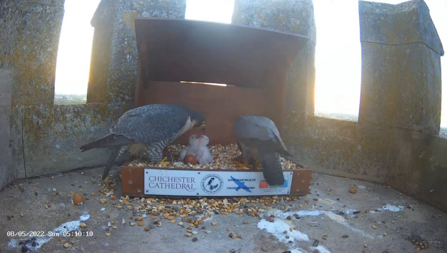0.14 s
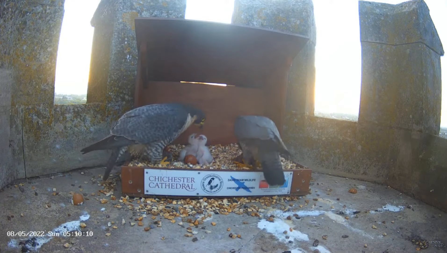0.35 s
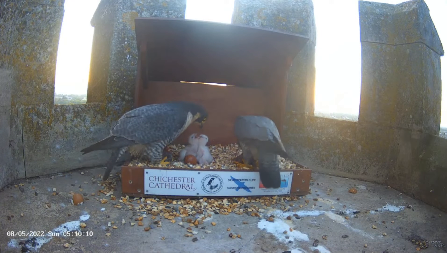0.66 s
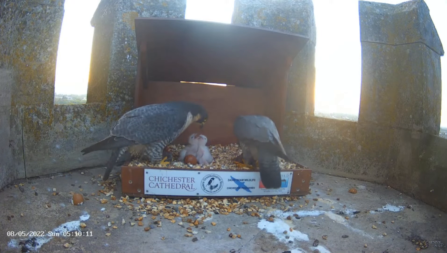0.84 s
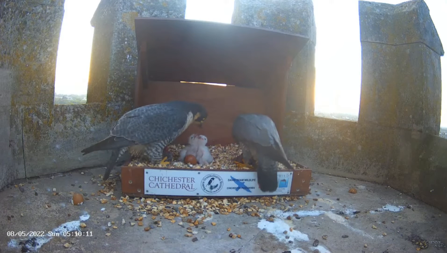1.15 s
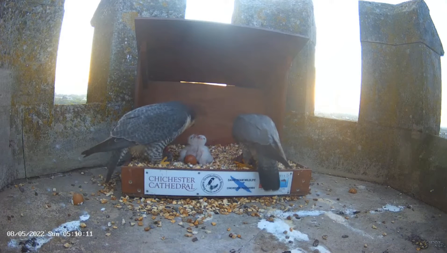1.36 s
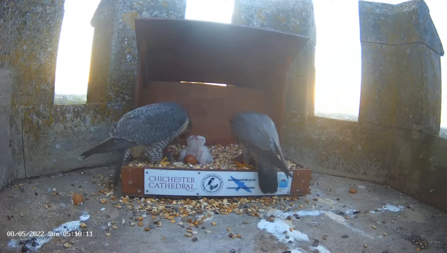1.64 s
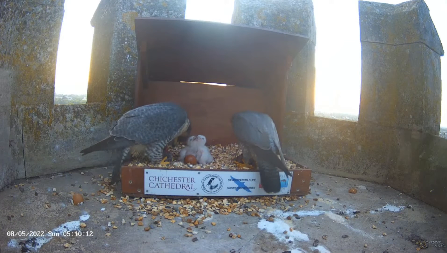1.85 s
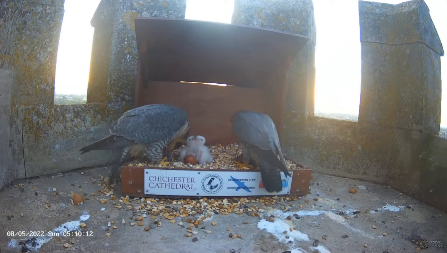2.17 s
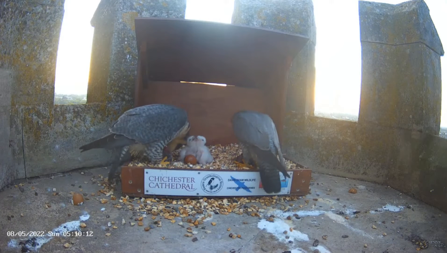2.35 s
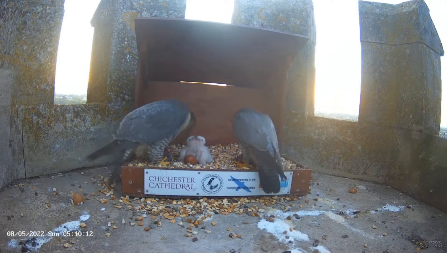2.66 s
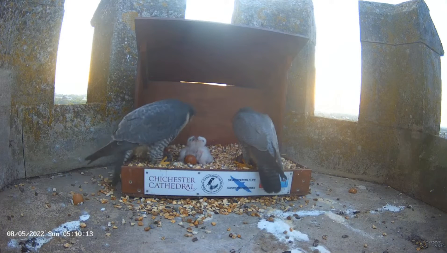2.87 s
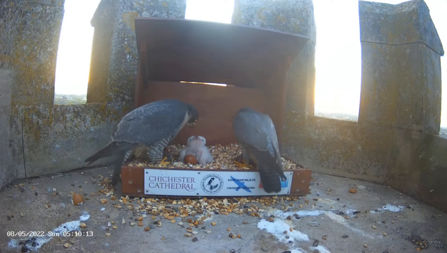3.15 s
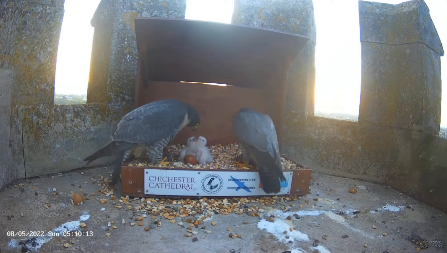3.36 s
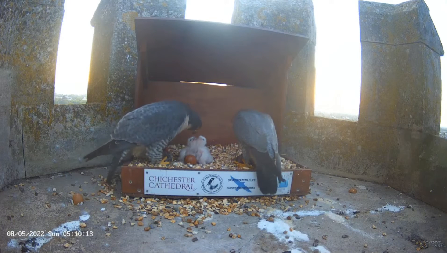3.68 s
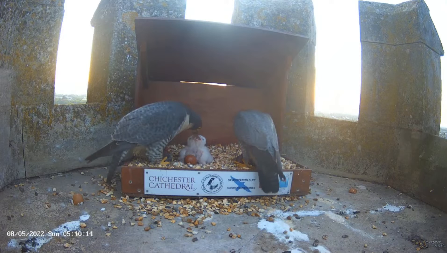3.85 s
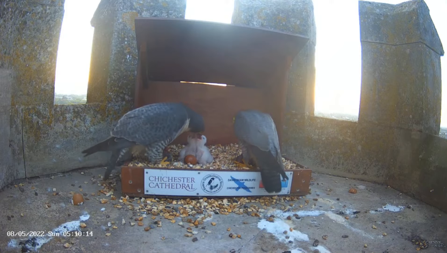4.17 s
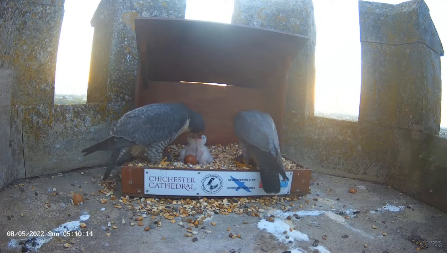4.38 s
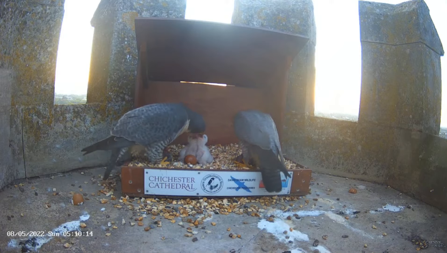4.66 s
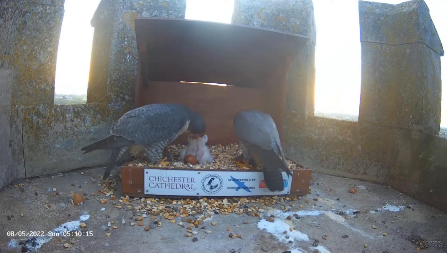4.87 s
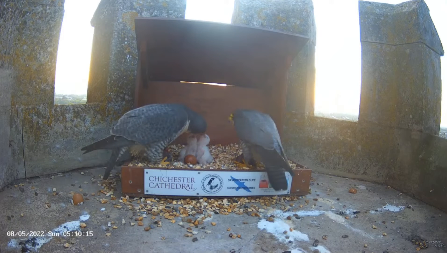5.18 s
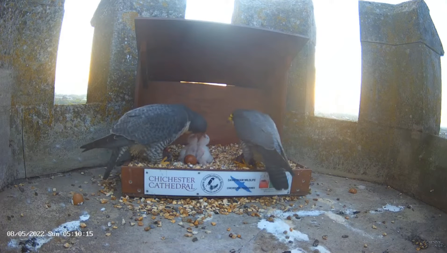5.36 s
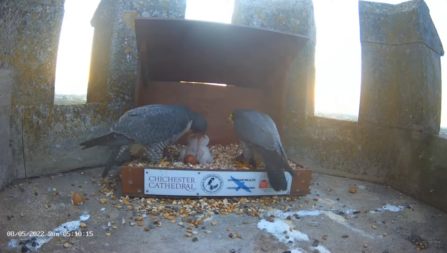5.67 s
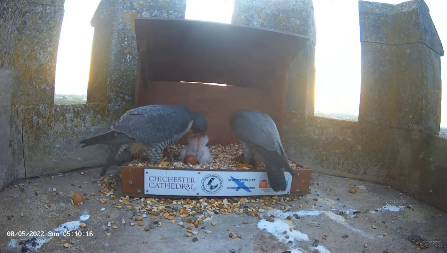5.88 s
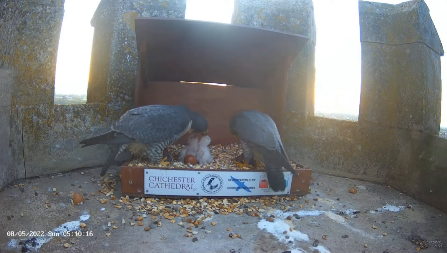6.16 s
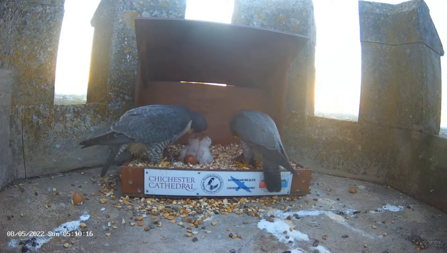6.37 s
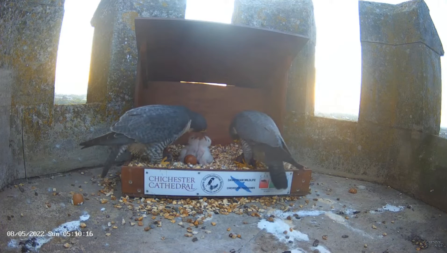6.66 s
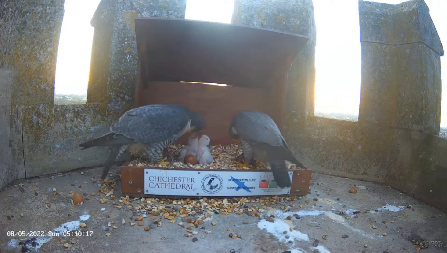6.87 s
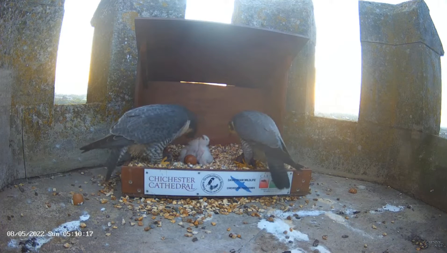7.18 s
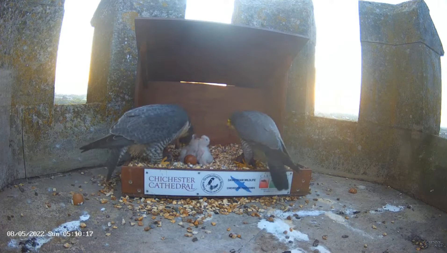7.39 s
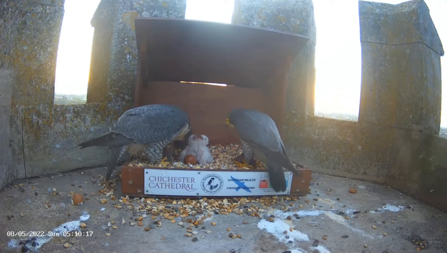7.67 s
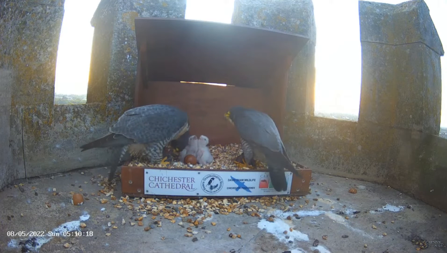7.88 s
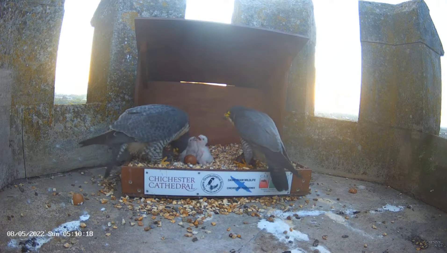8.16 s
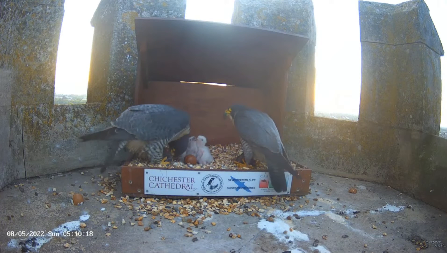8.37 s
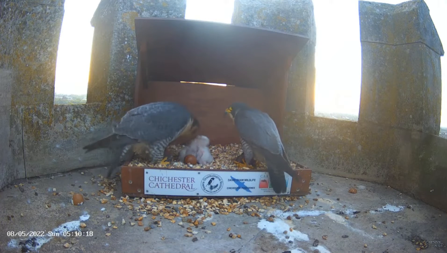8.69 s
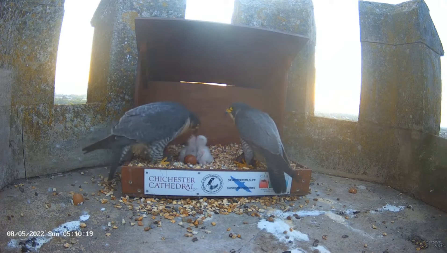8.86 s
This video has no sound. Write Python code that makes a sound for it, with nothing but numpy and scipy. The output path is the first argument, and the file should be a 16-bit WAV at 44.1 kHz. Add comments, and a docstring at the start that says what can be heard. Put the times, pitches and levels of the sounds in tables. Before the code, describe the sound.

Quiet outdoor nest close-up: weak, short cheeps and wheezes at first, a sparse lull, then two quick squeaky, cracking adult falcon calls. Trembling, reedy begging whines follow from a chick, briefly joined by a lower, shakier sibling. Soft gravel rustles and crisp clicks come near the close. Short stone reflections surround the birds, with far town rumble, hollow hum and steady electronic hiss.

```python
"""Falcon chicks begging in a nest box

Falcon chicks on a stone tower beg in thin, wavering whines and cheeps: trembling harmonics through a throat.
An adult gives two sharp ee-chups: gliding harmonics with rough noise between them, then a pulsed cluck.
Beak and gravel click and rustle as shaped noise bursts; a little wind bumps the microphone.
Behind lie a distant town, the hum of the hollow tower, and the nest camera's hiss and faint high whine.
"""
import sys
import numpy as np
from scipy import signal
from scipy.fft import rfft, irfft
from scipy.io import wavfile
from scipy.ndimage import uniform_filter1d

SR = 44100
rng = np.random.default_rng(int(sys.argv[2]) if len(sys.argv) > 2 else 0)


def int16_out(signal):
    """Quantize to a 16-bit WAV file."""
    q = np.round(np.clip(np.atleast_2d(signal).T, -1, 1) * 32767)
    wavfile.write(sys.argv[1], SR, q.astype(np.int16))


N = 398223


def undb(db):
    """Decibels to gain."""
    return 10 ** (np.asarray(db) / 20)


def unit(x):
    """Scale to rms 1."""
    return x / np.sqrt(np.mean(x ** 2) + 1e-20)


def add(out, s, x):
    """Mix x into out from time s."""
    i = max(int(s * SR), 0)
    out[i:i + len(x)] += x[:max(N - i, 0)]


def wander(size, hz):
    """Smooth random motion of spread 1, up to about hz."""
    f = np.fft.rfftfreq(size + SR // 4, 1 / SR)
    return unit(irfft(rfft(rng.standard_normal(size + SR // 4)) * np.exp(-(f / hz) ** 2)))[:size]


def resonate(x, hz, width):
    """One resonance, gain 1 at its centre."""
    return signal.lfilter(*signal.iirpeak(min(hz, SR / 2 - 500), hz / width, SR), x)


def colour(x, points):
    """Shape a sound by a (Hz, dB) spectrum."""
    hz, db = np.transpose(points)
    f = np.fft.rfftfreq(len(x), 1 / SR)
    return irfft(rfft(x) * undb(np.interp(np.log(f + 1), np.log(hz), db)), len(x))


def gate(size, edge_s):
    """An envelope that opens and closes smoothly."""
    t = np.arange(size) / SR
    return np.sin(np.pi / 2 * np.clip(np.minimum(t, t[::-1]) / edge_s, 0, 1)) ** 2


TIME = np.arange(N) / SR
TOP_HZ = 15700  # upper limit of the voices' harmonics and of the final low-pass

# Short, soft cheeps. Each row: start in seconds, length in seconds, start pitch in Hz, end pitch in Hz,
# mid-cheep level in dB before the throat.
CHEEPS = [(0.241, 0.137, 1745, 1850, -69), (0.353, 0.069, 1977, 2005, -64), (0.506, .06, 2200, 2120, -66),
          (0.716, 0.047, 2170, 2010, -69), (1.059, 0.14, 2240, 1915, -65), (1.311, 0.089, 2060, 1980, -71),
          (1.41, 0.17, 1950, 1740, -78), (5.153, 0.19, 2343, 2118, -59.5), (5.365, 0.17, 2310, 2060, -68),
          (5.534, 0.068, 2180, 1740, -63.5), (7.088, 0.079, 2440, 2220, -64)]
# Long begging whines, one list per breath. Each row: time in seconds, pitch in Hz, level in dB before the
# throat, gape in dB that the open beak adds to the overtones.
WHINES = [
    [(4.06, 2117, -60, -8), (4.1, 2310, -65.5, 3), (4.22, 2101, -50.5, -4), (4.326, 1927, -67.5, 6.5),
     (4.372, 2100, -54.5, -2), (4.46, 2110, -54, -3), (4.51, 2300, -67.5, 4), (4.666, 2315, -64.5, 1.5),
     (4.79, 2208, -64, 0), (4.86, 2353, -61.5, -4), (4.926, 2410, -60, -3), (4.97, 2220, -68, 2),
     (5.015, 2154, -53, -3)],
    [(5.962, 1680, -59, 0), (6.0, 2110, -54.5, 1.5), (6.028, 2225, -55, -3), (6.08, 2280, -63.5, -5),
     (6.11, 2185, -60, -14), (6.19, 2050, -64, -10)],
    [(6.295, 2180, -69, 2), (6.325, 2144, -62, -6), (6.39, 2570, -72, -12), (6.43, 2370, -64.5, -8),
     (6.45, 2600, -64, -10), (6.478, 2340, -66.5, 4), (6.565, 2310, -72, 8)],
    [(7.225, 2330, -77, 2), (7.27, 2346, -59, 3), (7.315, 2467, -55.5, -11), (7.39, 2364, -58.5, -1),
     (7.46, 2327, -63.5, 3), (7.525, 2446, -63, -6), (7.6, 2323, -66.5, 6), (7.69, 2530, -64.5, 3),
     (7.79, 2407, -66, -1), (7.885, 2680, -74, 8), (7.98, 2500, -70, -1), (8.04, 2750, -78, -3),
     (8.22, 2470, -73, 0)],
    [(8.645, 1500, -64, -2), (8.67, 1851, -55, 0.5), (8.72, 1854, -56, -6), (8.765, 2100, -65, 1),
     (8.795, 2120, -66, 7)],
    [(8.818, 2130, -62, 8), (8.85, 2117, -57, -3), (8.907, 2074, -51, -0.5), (8.975, 2190, -55, -5),
     (9.03, 2075, -53, -10)],
]
# A sibling's lower, shakier whine. Each row: time in seconds, pitch in Hz, level in dB before the throat.
SIBLING_WHINE = [(4.2, 1552, -62), (4.26, 1888, -59), (4.308, 1755, -58.5), (4.366, 2050, -60.5),
                 (4.531, 1950, -67), (4.564, 2108, -53), (4.603, 1910, -66), (4.636, 2102, -54),
                 (4.653, 1963, -65), (4.732, 2157, -65.5), (4.84, 2045, -60), (4.97, 2085, -71)]


def begging(arch_hz=64.5, end_fade_db=11.5):
    """Cheeps that bow upward in pitch and fade at both ends, and long whines; a sibling joins the first."""
    out = np.zeros(N)
    for start_s, length_s, start_hz, end_hz, level_db in CHEEPS:
        arch = np.sin(np.linspace(0, np.pi, int(length_s * SR)))
        hz = np.linspace(start_hz, end_hz, len(arch)) + arch_hz * arch
        cheep_db = level_db - end_fade_db * (1 - arch)
        add(out, start_s, chick(hz, cheep_db, gape_db=-3.5, rasp=0.0075))
    for curve in WHINES:
        hz, level_db, gape_db = follow(curve)
        add(out, curve[0][0], chick(hz, level_db, gape_db))
    hz, level_db = follow(SIBLING_WHINE)
    sibling = chick(hz, level_db, gape_db=0, waver=0.006, rasp=0.007, flutter_db=2.5, buzz=0.028)
    add(out, SIBLING_WHINE[0][0], sibling)
    return out


# What a chick's throat and open beak pass of each harmonic. Each row: frequency in Hz, gain in dB.
CHICK_THROAT = [(1500, -12), (1780, -7.5), (2100, -1.5), (2450, -0.5), (3000, -1), (3500, -4.5),
                (3850, -0.5), (4200, -14), (4700, -9.5), (5400, -18), (6000, -26.5), (7100, -22),
                (8600, -24), (12000, -17)]


def chick(hz, level_db, gape_db, waver=0.0057, rasp=0.0049, flutter_db=2, buzz=0.0044, buzz_hz=170):
    """A syrinx trembling in pitch and strength, hoarser where the pitch sags, filtered by throat and beak."""
    size = len(hz)
    slack = 1 + 2 * np.clip((1800 - hz) / 250, 0, 1)
    partials_db = []
    for k in range(1, 5):
        throat_db = shape_db(CHICK_THROAT, k * hz)
        partials_db.append(level_db + throat_db + gape_db * (k > 1) + flutter_db * wander(size, 36))
    # a slow second vibration of the syrinx puts side tones beside each harmonic
    throb_hz = buzz_hz * (1 + 0.127 * wander(size, 19))
    throb = np.sin(2 * np.pi * np.cumsum(throb_hz) / SR)
    tremble = waver * wander(size, 39.7) + rasp * slack * wander(size, 540) + buzz * throb
    return syrinx(hz * (1 + tremble), partials_db) * gate(size, 0.011)


def syrinx(hz, levels_db):
    """Harmonics of a vibrating membrane, each at its own rms level."""
    phase = 2 * np.pi * np.cumsum(hz) / SR
    return np.sqrt(2) * sum(undb(db) * np.sin(k * phase) * (k * hz < TOP_HZ) for k, db in enumerate(levels_db, 1))


def follow(curve):
    """Interpolate the controls of a whine sample by sample."""
    time_s, *columns = np.transpose(curve)
    sample_s = np.arange(time_s[0], time_s[-1], 1 / SR)
    return [np.interp(sample_s, time_s, column) for column in columns]


def shape_db(points, hz):
    """Read a (Hz, dB) spectrum at hz on a log-frequency axis."""
    at_hz, db = np.transpose(points)
    return np.interp(np.log(hz), np.log(at_hz), db)


# Hoarse, half-voiced cheeps. Each row: start in seconds, length in seconds, start pitch in Hz,
# end pitch in Hz, level in dB.
WHEEZES = [(0, 0.058, 4100, 3370, -73.5), (0.065, 0.13, 3420, 2720, -73.5), (1.994, 0.072, 4200, 3620, -74),
           (2.081, 0.19, 3900, 3250, -77), (2.951, 0.14, 4370, 3700, -78), (3.08, 0.11, 3330, 3720, -74),
           (3.197, 0.15, 3020, 4020, -75), (3.447, 0.12, 4000, 4400, -80), (4.037, .13, 3540, 3450, -72),
           (4.19, 0.075, 1000, 1770, -72), (4.313, .07, 3450, 2700, -76), (4.715, 0.083, 3244, 2885, -74.5),
           (5.4, 0.11, 3500, 3020, -76), (5.96, 0.02, 2580, 2700, -63), (6.1, .075, 3550, 3600, -77),
           (6.286, 0.11, 4100, 3570, -76), (8.095, 0.1, 3900, 4280, -76)]


def wheezes(rasp=0.0355):
    """Weak cheeps of one partial whose pitch is too unsteady to ring clear."""
    out = np.zeros(N)
    for start_s, length_s, start_hz, end_hz, level_db in WHEEZES:
        size = int(length_s * SR)
        hz = np.geomspace(start_hz, end_hz, size) * (1 + rasp * wander(size, 226))
        wheeze = syrinx(hz, [level_db + 3 * wander(size, 90)])
        add(out, start_s, wheeze * gate(size, length_s / 4))
    return out


# The adult's ee-chups. Each row: time of the break in seconds, squeak's lead in seconds, squeak top in Hz,
# mid-squeak level in dB before colour, break level in dB, chup pitch in Hz, chup level in dB,
# share by which the chup starts sharp, chup attack in seconds, lasting chup roughness.
EE_CHUPS = [(3.6142, 0.034, 1833, -37, -33.5, 1727, -27, 0.053, 0.0154, 0.22),
            (3.872, 0.046, 1993, -38, -26, 1843, -24.5, .22, .005, .55)]
# The half-closed beak favours one band of the squeak. Each row: frequency in Hz, gain in dB.
SQUEAK_COLOUR = [(1500, -4.5), (1750, -19), (2500, -17.5), (3050, -13.5), (3450, 2.5), (3900, -4),
                 (4500, -21), (5050, -19.5), (5600, -27), (8000, -27)]


def adult(crack_rough=0.85, calm_s=0.0045):
    """A rising squeak cracks, drops into a loud note that starts harsh and clears, and closes with a cluck."""
    squeak_s, whistle_hz, whistle_lap_s = 0.038, 2500, 0.003
    out = np.zeros(N)
    for break_s, lead_s, top_hz, squeak_db, break_db, chup_hz, chup_db, sharp, attack_s, rough in EE_CHUPS:
        # squeak: climbs, loudest in its middle
        hz = glide(squeak_s, 1463, top_hz, settle=1.33)
        swell_db = squeak_db - 2.5 * (1 - np.sin(np.linspace(0, np.pi, len(hz))))
        partials_db = [swell_db + shape_db(SQUEAK_COLOUR, k * hz) for k in range(1, 4)]
        add(out, break_s - lead_s, note(hz, partials_db, rough=0.59, edge_s=0.0025))

        # if the break comes late, the voice flips up to a thin whistle until then
        if lead_s > squeak_s:
            hz = np.full(int((lead_s - squeak_s + 2 * whistle_lap_s) * SR), float(whistle_hz))
            whistle = undb(-44.5) * note(hz, [-12, 0, -15], rough=0.48, edge_s=0.0026)
            add(out, break_s - lead_s + squeak_s - whistle_lap_s, whistle)

        # break: the voice cracks and tumbles
        hz = glide(0.012, 3770, 2850, settle=1.2)
        add(out, break_s, undb(break_db) * note(hz, [0, -22, -46], rough=0.8, edge_s=0.0029))

        # chup: swells from 22.5 dB below its level
        hz = glide(0.028, chup_hz * (1 + sharp), chup_hz, settle=3.93)
        t = np.arange(len(hz)) / SR
        swell = undb(chup_db - 22.5 * np.clip(1 - t / attack_s, 0, 1) ** 2)
        harsh = rough + crack_rough * np.exp(-t / calm_s)
        add(out, break_s + 0.004, swell * note(hz, [0, -4, -25], harsh, edge_s=0.0054))

        # rough tail over a low cluck
        hz = glide(0.023, chup_hz, chup_hz * 0.97, settle=1.3)
        tail = note(hz, [0, -10.5, -23], rough=0.43, edge_s=0.0027)
        add(out, break_s + 0.02, undb(chup_db - 18.5) * tail)
        add(out, break_s + 0.028, undb(chup_db - 9.5) * cluck())
    return out


def note(hz, partials_db, rough, edge_s):
    """Five harmonics of the adult's voice; roughness jitters them and adds noise between them and at the beak."""
    size = len(hz)
    low_db, octave_db, third_db = partials_db
    harmonics_db = [low_db, octave_db, third_db, third_db - 11, third_db - 13]
    tone = syrinx(hz * (1 + 0.05 * rough * wander(size, 1000)), harmonics_db)
    shimmer = undb(2.5 * rough * wander(size, 970))
    rasp = undb(-11) * noise_band(size, 2500, 2200)
    beak_air = undb(-18) * noise_band(size, 8140, 1300)
    noise = rough * undb(np.maximum(low_db, octave_db)) * (rasp + beak_air)
    return (tone * shimmer + noise) * gate(size, edge_s)


def glide(length_s, start_hz, end_hz, settle):
    """A pitch glide that slows exponentially as it nears its end."""
    progress = np.expm1(-settle * np.linspace(0, 1, int(length_s * SR))) / np.expm1(-settle)
    return start_hz + (end_hz - start_hz) * progress


# Resonances of the adult's throat. Each row: centre in Hz, width in Hz, gain in dB relative to the others.
THROAT = [(460, 350, 11), (755, 840, -13), (1450, 430, 0.5), (2795, 400, -16.5)]


def cluck(pulse_hz=470, scatter=0.13, soft_hz=2900):
    """The slackening membrane flaps softly a few uneven times and rings the throat."""
    size = int(0.013 * SR)
    flap_hz = pulse_hz * (1 + scatter * wander(size, 400))
    cycles = np.floor(np.cumsum(flap_hz) / SR + 0.64)
    flaps = np.diff(cycles, prepend=0) * gate(size, 0.000835)
    flaps = np.pad(flaps, (0, size))  # room to ring
    soften = signal.butter(3, [330, soft_hz], "band", fs=SR, output="sos")
    flaps = signal.sosfilt(soften, flaps)
    ringing = sum(undb(db) * resonate(flaps, hz, width_hz) for hz, width_hz, db in THROAT)
    return unit(ringing) / np.sqrt(2)


def noise_band(size, hz, width):
    """Noise of rms 1 in a steep-sided band."""
    return unit(resonate(resonate(rng.standard_normal(size), hz, width), hz, width))


# Beak and gravel clicks. Each row: time in seconds, peak level in dB before strength_db,
# treble gain in dB before bright_db, ring t60 in seconds.
CLICKS = [(0.6544, -58, -24, 0.03), (0.9169, -57, -16, 0.033), (1.5934, -58.5, -28, 0.03),
          (3.2844, -56.5, -37, 0.045), (4.1674, -51.5, -5, 0.043), (4.3767, -52, -26, 0.022),
          (5.2104, -59, -2, 0.019), (8.3588, -35, -35, 0.023), (8.3642, -41.5, -6, 0.03),
          (8.4716, -47, -27, 0.033), (8.4993, -51, -21, 0.036), (8.519, -32.5, -2.5, 0.049)]
# Spectrum of a click. Each row: frequency in Hz, gain in dB.
CLICK_COLOUR = [(120, -36), (200, -7.5), (694, -1.5), (1140, -10), (2780, -3.5), (3090, -6), (3630, 5),
                (5560, -14.5), (8980, -7.5), (14000, -33)]


def clicks(strength_db=-6, bright_db=6, grain_db=3):
    """A snap and a quickly dying crunch of tiny contacts: coloured noise, uneven and decaying."""
    out = np.zeros(N)
    t = np.arange(SR // 8) / SR
    treble_band = signal.butter(2, [5500, 10500], "band", fs=SR, output="sos")
    for click_s, level_db, treble_db, t60_s in CLICKS:
        grain = undb(grain_db * wander(len(t), 560))
        crunch = rng.standard_normal(len(t)) * grain * np.exp(-np.log(1000) * t / t60_s)
        body = colour(np.pad(crunch, (SR // 100, 0)), CLICK_COLOUR)
        treble = signal.sosfiltfilt(treble_band, body)
        snap = body + (undb(treble_db + bright_db) - 1) * treble
        peak = np.sqrt(uniform_filter1d(snap ** 2, SR // 500).max())  # rms over 2 ms
        add(out, click_s - 1 / 100, undb(level_db + strength_db) * snap / peak)
    return out


# Feet and feathers stir the gravel. Each row: start in seconds, length in seconds, centre in Hz,
# rms level in dB before the swell.
RUSTLES = [(2.377, 0.34, 880, -72), (8.256, 0.11, 3370, -72.5), (8.427, 0.09, 3470, -63),
           (8.559, 0.12, 3700, -70)]


def rustles(grain_db=5):
    """Soft swells of uneven scraping: band noise with a random grain."""
    out = np.zeros(N)
    for start_s, length_s, hz, level_db in RUSTLES:
        size = int(length_s * SR)
        scrape = noise_band(size, hz, 1700) * undb(grain_db * wander(size, 93))
        add(out, start_s, undb(level_db) * unit(scrape) * gate(size, length_s / 3))
    return out


def stone_walls(x, wet_db, t60_s):
    """Dense, short reflections from the box and the parapet: decaying noise convolved with the sound."""
    t = np.arange(SR // 3) / SR
    tail = rng.standard_normal(len(t)) * np.exp(-np.log(1000) * t / t60_s) * (t > 0.004)
    tail = resonate(tail, 1200, 6000)
    tail = tail / np.linalg.norm(tail)
    return x + undb(wet_db) * signal.fftconvolve(x, tail)[:N]


# Puffs of wind. Each row: start in seconds, length in seconds, level in dB before the swell.
PUFFS = [(5.929, .1, -56), (6.033, 0.19, -53), (6.184, 0.1, -57.5), (6.728, .17, -54)]


def wind(corner_hz=70):
    """Soft low bumps of air on the microphone: slow random pressure."""
    out = np.zeros(N)
    for start_s, length_s, level_db in PUFFS:
        size = int(length_s * SR)
        add(out, start_s, undb(level_db) * wander(size, corner_hz) * gate(size, length_s / 2))
    return out


# Distant town and microphone hiss. Each row: frequency in Hz, relative level in dB.
FLOOR = [(15, -44), (25, 0.5), (86, -2), (126, -6.5), (164, -4), (313, -11), (340, -14), (482, -11),
         (1100, -13.5), (1600, -20.5), (2010, -20), (3530, -21.5), (7910, -27), (10400, -27.5),
         (11200, -26.5), (12200, -33.5), (15500, -33.5)]
# Swell of the distant town. Each row: time in seconds, level in dB before the rows' mean is taken off.
TOWN = [(0, 1.5), (2.7, 1.2), (2.999, 0.7), (8, -1), (8.999, 1)]
# Low hum of the hollow tower. Each row: centre in Hz, width in Hz, rms level in dB before the swell.
HOLLOW = [(92, 8.5, -73.5), (160.2, 16, -73.5), (317, 9.1, -79.5), (475, 24.9, -77.5)]
# Whine of the camera's electronics. Each row: frequency in Hz, rms level in dB before its flutter.
CAMERA_WHINE = [(4134.4, -84.5), (5512.5, -89), (6890.6, -89.5), (8268.8, -84), (9646.9, -86), (11025, -72)]


def background(air_db=-65, air_flicker_db=0.03, hiss_db=-80, whine_flutter_db=1.3):
    """Coloured town noise and resonant tower hum that swell together, and the camera's hiss and steady tones."""
    time_s, town_db = np.transpose(TOWN)
    swell = undb(np.interp(TIME, time_s, town_db - np.mean(town_db)))
    air_gain = undb(air_db + air_flicker_db * wander(N, 8))
    air = air_gain * unit(colour(rng.standard_normal(N), FLOOR))
    rumble = signal.sosfiltfilt(signal.butter(2, 500, fs=SR, output="sos"), air)
    hum = np.zeros(N)
    for hz, width_hz, level_db in HOLLOW:
        hum += undb(level_db) * unit(resonate(rng.standard_normal(N), hz, width_hz))
    whine = np.zeros(N)
    for hz, level_db in CAMERA_WHINE:
        gain = undb(level_db + whine_flutter_db * wander(N, 13.4))
        whine += np.sqrt(2) * gain * np.sin(2 * np.pi * hz * TIME)
    hiss = undb(hiss_db) * noise_band(N, 11300, 700)
    # only the air below 500 Hz swells
    return air - rumble + swell * (rumble + hum) + whine + hiss


def scene():
    """Chicks, adult, clicks and rustles ring in the stone enclosure; background and wind stay dry."""
    nest = stone_walls(begging() + wheezes(), wet_db=-13.5, t60_s=0.1)
    parent = stone_walls(adult() + clicks() + rustles(), wet_db=-15.5, t60_s=0.079)
    return (nest + parent + background() + wind())[None]


# The sound cuts out for an instant. Each row: start in seconds, length in seconds.
DROPOUTS = [(3.6088, .002), (3.8861, .0026)]


def record(dry):
    """The camera drops two instants of sound, then a steep low-pass cuts the top."""
    live = np.ones(N)
    for start_s, length_s in DROPOUTS:
        live[(TIME > start_s) & (TIME < start_s + length_s)] = 0
    low_pass = signal.ellip(10, 0.2, 70, TOP_HZ, fs=SR, output="sos")
    return signal.sosfilt(low_pass, dry * live)


dry = scene()
out = record(dry)
int16_out(out)
```